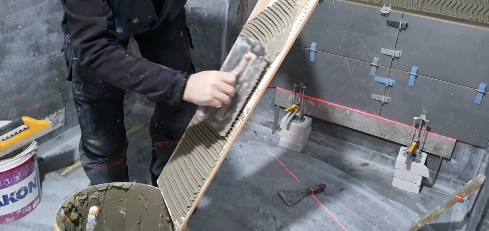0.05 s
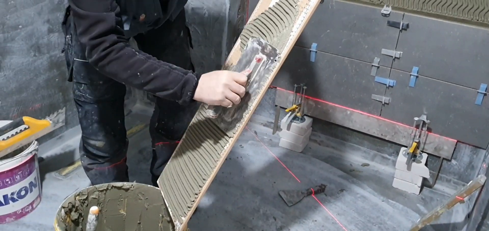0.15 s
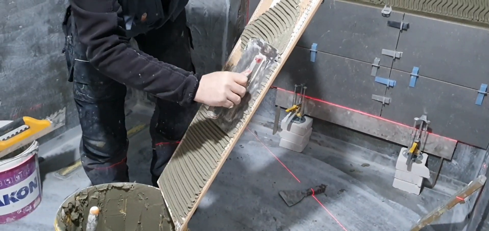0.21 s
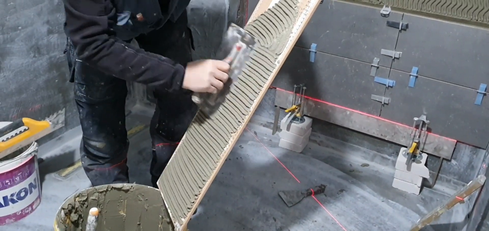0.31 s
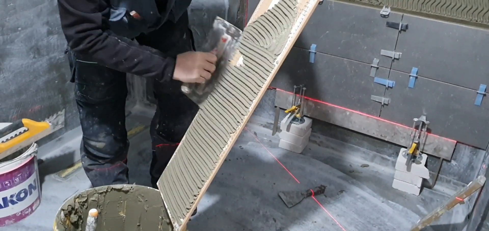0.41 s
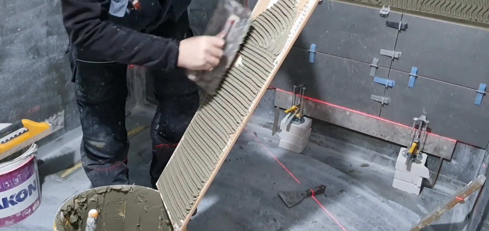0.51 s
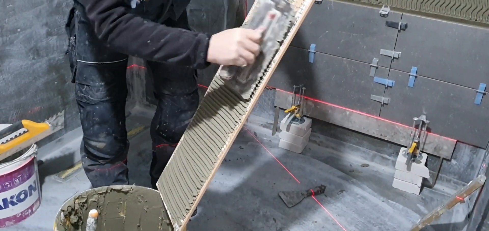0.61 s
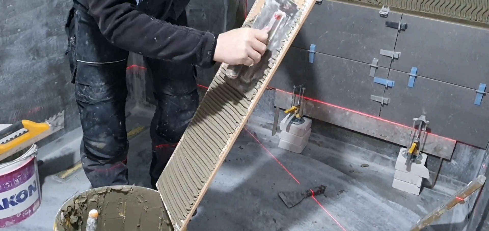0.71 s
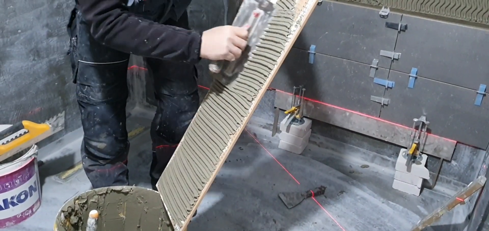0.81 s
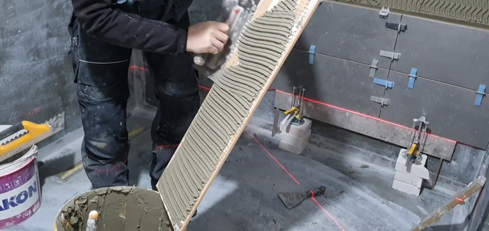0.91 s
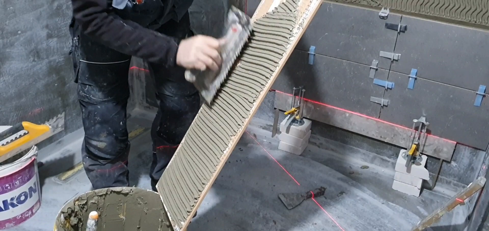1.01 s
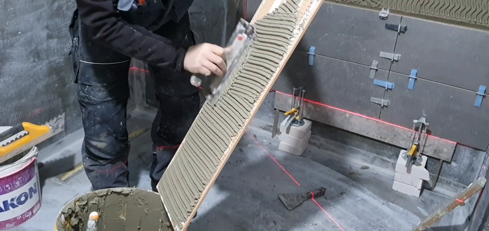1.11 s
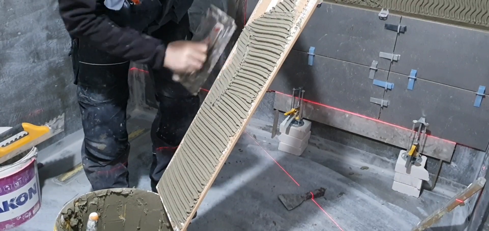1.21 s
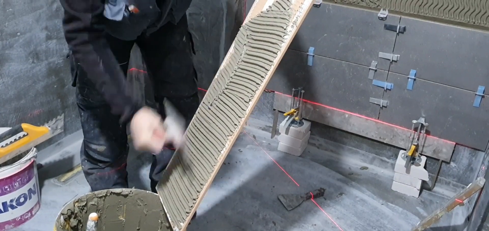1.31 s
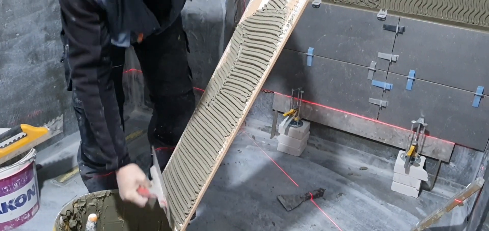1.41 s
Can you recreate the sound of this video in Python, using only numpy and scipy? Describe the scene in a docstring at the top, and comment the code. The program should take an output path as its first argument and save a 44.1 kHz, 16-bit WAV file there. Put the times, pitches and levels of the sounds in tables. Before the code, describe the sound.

A notched steel trowel combs sandy adhesive across a large tile in two long gritty rasps, each after a soft landing, then a short swipe with a sharp knock; close stereo in a small bare room.

```python
"""A faint room rumble, a scuff and a dull bump come first; then a notched steel trowel combs sandy adhesive over
a large tile in a small bare room: two long strokes, each after a soft landing, and a short swipe with a knock.
Sand grains slip under teeth all along the blade, the blade colours the rasp and the dragged paste shakes the tile.
Each spot along the blade has its own path to left and right; bumps, scuffs and bright hissing swells lie beneath."""
import sys
import numpy as np
from scipy import signal
from scipy.fft import rfft, irfft
from scipy.io import wavfile

SR = 44100
rng = np.random.default_rng(int(sys.argv[2]) if len(sys.argv) > 2 else 0)


def store_wav(level_fs):
    """Save 16-bit WAV to argv[1]."""
    pcm = np.round(np.clip(np.atleast_2d(level_fs), -1, 1) * 32767)
    wavfile.write(sys.argv[1], SR, pcm.T.astype(np.int16))


N = 66150  # 1.5 s


def undb(db):
    """Decibels to gain."""
    return 10 ** (np.asarray(db) / 20)


def unit(x):
    """Scale to rms 1."""
    return x / np.sqrt(np.mean(x ** 2))


def at_hz(points, hz):
    """Read (hz, value) points on a log-frequency axis."""
    point_hz, values = np.array(points, float).T
    return np.interp(np.log(np.maximum(hz, 1)), np.log(point_hz), values)


def colour(x, points):
    """Causal minimum-phase filter through (hz, db) points that keeps the power of white noise."""
    size = 2 * N
    gain = unit(undb(at_hz(points, np.fft.rfftfreq(size, 1 / SR))))
    # folding the cepstrum forward in time makes the filter causal
    cepstrum = irfft(np.log(gain))
    cepstrum[1:N] *= 2
    cepstrum[N + 1:] = 0
    return irfft(rfft(x, size) * np.exp(rfft(cepstrum)))[..., :N]


def resonance(hz, width_hz):
    """Points (hz, db) of a steep-sided resonance, 6 dB down at the edges of its width."""
    f = np.geomspace(20, 20000, 200)
    detuning = (f / hz - hz / f) * hz / width_hz
    return list(zip(f, -20 * np.log10(1 + detuning ** 2)))


# Likeness of left and right by frequency. Columns: pitch_hz, likeness (1 alike, 0 unrelated, -1 opposite)
CHANNEL_LIKENESS = [(100, 0.9), (250, 0.95), (500, 0.73), (1100, -0.064), (2000, -0.2), (4000, -0.23),
                    (9000, 0.08), (15000, 0.69)]


def pair(size):
    """Left and right noise whose likeness varies with frequency, shared out between their sum and difference."""
    like = np.clip(at_hz(CHANNEL_LIKENESS, np.fft.rfftfreq(size, 1 / SR)), -.99, .99)
    mid, side = rfft(rng.standard_normal((2, size)))
    mid = mid * np.sqrt((1 + like) / 2)
    side = side * np.sqrt((1 - like) / 2)
    return irfft(np.array([mid + side, mid - side]), size)


# Tone of the quiet room. Columns: pitch_hz, level_db (relative)
RUMBLE_TONE = [(25, -14), (55, -8.5), (85, 2.5), (130, -17), (270, -10.5), (600, -14.5), (1200, -16.5),
               (3000, -25.5), (8000, -30), (16000, -51.5)]
RUMBLE_DB = -68.5


def rumble():
    """Steady coloured noise on left and right: the faint rumble of the room."""
    return undb(RUMBLE_DB) * colour(pair(N), RUMBLE_TONE)


GRAINS_PER_S, GRAIN_SPREAD_DB = 2500, 3.5  # at each spot along the blade; scale of the random sizes


def grains(count=6):
    """Dense slips of sand, many small and a few large: one row per spot along the blade, total power 1."""
    hit = rng.random((count, N)) < GRAINS_PER_S / SR
    excess = np.minimum(rng.exponential(size=(count, N)), 5)
    size = undb(GRAIN_SPREAD_DB * excess)
    sign = rng.choice([-1, 1], (count, N))
    return unit(hit * size * sign) / np.sqrt(count)


def touches(events, tone, t):
    """Coloured grains under the summed exponential rises and decays of a table of events."""
    envelope = 0
    for peak_s, level_db, rise_s, decay_s in events:
        before, after = np.maximum(peak_s - t, 0), np.maximum(t - peak_s, 0)
        envelope = envelope + undb(level_db) * np.exp(-before / rise_s - after / decay_s)
    return colour(grains() * envelope, tone)


# Soft scuffs of tool and hand. Columns: peak_s, level_db, rise_s, decay_s
SCUFF_EVENTS = [(0.008, -49.5, 0.029, 0.013), (0.058, -61, 0.0062, .015), (1.102, -49.5, 0.0073, 0.0071),
                (1.47, -74.5, .015, 0.021)]
# Their tone. Columns: pitch_hz, level_db (relative)
SCUFF_TONE = [(70, -2.5), (160, -15.5), (280, 8.5), (430, -5), (680, 1.5), (1000, -1.5), (2200, -4.5),
              (4500, -6), (7000, -21), (12000, -30)]


def scuffs(t):
    """Tool and hand brush softly: short swells of grains, strongest in the low middle."""
    return touches(SCUFF_EVENTS, SCUFF_TONE, t)


# Dull handling bumps. Columns: peak_s, level_db, rise_s, decay_s
BUMP_EVENTS = [(0.008, -62, 0.034, 0.026), (0.32, -46.5, 0.011, 0.025), (0.422, -43.5, 0.034, 0.01),
               (0.945, -53.5, .012, 0.049), (1.113, -50.5, 0.0034, 0.02)]
# Their tone. Columns: pitch_hz, level_db (relative)
BUMP_TONE = [(25, -19), (60, 3), (120, 2.5), (200, -7.5), (400, -23), (1200, -42)]


def bumps(t):
    """Handling of the tool bumps dully: bass-heavy swells of grains."""
    return touches(BUMP_EVENTS, BUMP_TONE, t)


# Blade lands in the paste. Columns: peak_s, level_db, rise_s, decay_s
LANDING_EVENTS = [(0.111, -46.5, 0.0061, 0.02), (0.654, -45, 0.0014, 0.078)]
# Their tone. Columns: pitch_hz, level_db (relative)
LANDING_TONE = [(80, -22.5), (300, -8.5), (480, -6.5), (730, 0), (880, -2.5), (1300, -2), (2200, -2.5),
                (4000, -4.5), (7000, -10), (10000, -15), (16000, -18)]


def landings(t):
    """The blade lands grittily, cushioned by paste, before each long stroke."""
    return touches(LANDING_EVENTS, LANDING_TONE, t)


# Bright hissing swells around and after the strokes. Columns: peak_s, level_db, rise_s, decay_s
BRIGHT_SWELL_EVENTS = [(0.16, -57, .03, 0.056), (0.525, -62, 0.015, 0.061), (1.0, -48, .01, 0.024),
                       (1.11, -59.5, 0.014, 0.13)]
# Their tone. Columns: pitch_hz, level_db (relative)
BRIGHT_SWELL_TONE = [(300, -16), (1500, 5), (4000, 0), (8000, -3), (16000, -9)]


def bright_swells(t):
    """Bright grains swell and fade in a quiet hiss around and after the strokes."""
    return touches(BRIGHT_SWELL_EVENTS, BRIGHT_SWELL_TONE, t)


JUDDER_KNOTS_PER_S, JUDDER_DB = 200.7, 0.44


def judder():
    """Small random wander of the push, drawn as straight lines between random knots, in gain of rms 1."""
    knots = rng.standard_normal(4000)
    wander = unit(np.interp(np.arange(N) / SR * JUDDER_KNOTS_PER_S, np.arange(len(knots)), knots))
    return unit(undb(JUDDER_DB * wander))


# Three strokes over the tile, before the trims below. Columns: time_s, rasp_db,
# then relative to the rasp: drag_db, low_blade_db, high_blade_db, hiss_db
STROKE_PATHS = [
    [(0.209, -48, -26, 0.5, 5.5, -2.5), (0.223, -47, -31, -8, 7, -4.5), (0.255, -35, -8, -3, -2, -5),
     (0.335, -28.5, -6, -4, -2, -2.5), (0.361, -30, -7, -1.5, 0.5, -2), (0.405, -25, -17.5, -9, -3.5, -6),
     (0.458, -33, -0.5, -3, -2.5, -1.5)],
    [(0.714, -45, -6, -1.5, 1, -3.5), (0.736, -41, -12, -7.5, -6, -7), (0.756, -32.5, -10, 0, -3.5, -6.5),
     (0.844, -36, -3, 3.5, 6, -1), (0.856, -31, -12.5, -3.5, -12, -5.5), (0.91, -32, -6, -11, 5.5, 0.5),
     (0.924, -29, -15, -2, 1, -0.5), (0.966, -34.5, 1.5, -5, -6, -4.5)],
    [(1.168, -46.5, 8, -2, 5, -0.5), (1.184, -35, -8, -2, -5, -3.5), (1.216, -40, 0, 0, -6, -11),
     (1.224, -55, 1.5, 9, 8, -6), (1.25, -52, 9, 2, 1, -9)],
]
ATTACK_S, RELEASE_S = .003, .004
RASP_TRIM_DB, DRAG_TRIM_DB, HISS_TRIM_DB = 2, -2, 3
# Tones of rasp, dragged paste and fine hiss. Columns: pitch_hz, level_db (relative)
RASP_TONE = [(200, -30), (450, -13.5), (800, -12), (1200, -13.5), (1800, -2), (2800, 1), (3800, -2),
             (5500, -5.5), (7600, -4.5), (9500, -16.5), (16000, -40)]
DRAG_TONE = [(25, -34.5), (50, -16), (90, -9.5), (160, -7), (280, 0.5), (420, -5), (560, 0), (700, -4.5),
             (1000, -21), (2000, -36)]
HISS_TONE = [(4000, -46.5), (7000, -7), (8500, 0.5), (10500, 1), (13000, 2.5), (16000, -1)]
# Two resonances of the blade. Columns: pitch_hz, width_hz, trim_db
BLADE_RESONANCES = [(1218, 1050, -0.5), (3910, 1980, 0)]


def scrape(t):
    """Each stroke drives grains through rasp, paste drag, two blade resonances and hiss, juddering together."""
    drive = np.zeros((5, N))
    for stroke in STROKE_PATHS:
        time_s, rasp_db, *shares_db = np.array(stroke, float).T
        before, after = np.maximum(time_s[0] - t, 0), np.maximum(t - time_s[-1], 0)
        gate = np.exp(-before / ATTACK_S - after / RELEASE_S)
        push = gate * undb(np.interp(t, time_s, rasp_db))
        drive += [push] + [push * undb(np.interp(t, time_s, share_db)) for share_db in shares_db]
    rasp, drag, low, high, hiss = drive * judder()
    out = undb(RASP_TRIM_DB) * colour(grains() * rasp, RASP_TONE)
    out = out + undb(DRAG_TRIM_DB) * colour(grains() * drag, DRAG_TONE)
    for force, (hz, width_hz, trim_db) in zip((low, high), BLADE_RESONANCES):
        out = out + undb(trim_db) * colour(grains() * force, resonance(hz, width_hz))
    return out + undb(HISS_TRIM_DB) * colour(grains() * hiss, HISS_TONE)


# Trowel meets the tile's lower edge. Columns: peak_s, level_db, rise_s, decay_s
KNOCK_EVENTS = [(1.19, -26, 0.012, 0.0084)]
# Its tone. Columns: pitch_hz, level_db (relative)
KNOCK_TONE = [(70, -14), (150, -15.5), (450, -7), (570, -4.5), (660, 6), (760, -11), (940, 5),
              (1080, -14.5), (1210, 7), (1500, -15.5), (1830, -4.5), (2600, -6.5), (4200, -0.5), (8000, -8),
              (10000, -12.5), (16000, -28)]


def knock(t):
    """The trowel knocks grittily on the tile's lower edge: a short burst of grains with several tonal peaks."""
    return touches(KNOCK_EVENTS, KNOCK_TONE, t)


# Ringing of tile and blade, before the trim below. Columns: pitch_hz, level_db, t60_s
RING_MODES = [(267.6, -5, 0.36), (284, -9.5, 0.18), (540, -7, 0.17), (554, -4, 0.25), (668, -7.5, 0.28),
              (928, -8, 0.08), (1213, -1.5, .36), (1240, -13.5, 0.51), (1395, -10.5, .2), (1920, -8, .25),
              (2284, -8.5, 0.14), (2790, -15, 0.14), (3450, -4, 0.13), (3960, -16.5, .2)]
RING_TRIM_DB = -2.5


def ring(x, t):
    """Tile and blade ring on at their modes, each a decaying cosine set off by the work."""
    response = 0
    for hz, level_db, t60_s in RING_MODES:
        damping = np.log(1000) / t60_s  # 60 dB down after t60_s
        gain = undb(level_db + RING_TRIM_DB) * 4 * damping / SR
        response = response + gain * np.exp(-damping * t) * np.cos(2 * np.pi * hz * t)
    return signal.fftconvolve(x, response)[:N]


# Decay of the small bare room. Columns: pitch_hz, t60_s
ROOM_DECAY = [(100, 0.2), (700, 0.3), (2000, 0.26), (5000, 0.24), (13000, 0.06)]
# Reverberation, before the overall room gain. Columns: pitch_hz, level_db
ROOM_LEVEL = [(100, -7), (500, -0.5), (1200, 0.5), (4000, -2), (8000, -5.5), (14000, -6)]
EARLY_S, EARLY_DB = 0.0054, 3  # scatter off the tile, the arm and the floor, relative to the tail
DIRECT_DB, ROOM_GAIN_DB = -2, -.5  # direct sound before the gain; gain on direct and reverberation


def room(x, size=16384):
    """One spot to left and right: direct sound, quick scatter from near surfaces and a tail shortest on top."""
    t, hz = np.arange(size) / SR, np.fft.rfftfreq(size, 1 / SR)
    centres = np.geomspace(60, 16000, 12)
    late, early = rfft(pair(size)), rfft(pair(size))
    scatter = undb(EARLY_DB) * unit(np.exp(-t / EARLY_S))
    response = np.zeros((2, size))
    for k, centre in enumerate(centres):
        # triangular band between neighbouring centres
        band = at_hz(list(zip(centres, np.arange(len(centres)) == k)), hz)
        decay = np.exp(-np.log(1000) * t / at_hz(ROOM_DECAY, centre))
        tail = unit(decay * (1 - np.exp(-t / EARLY_S)))
        reverberation = irfft(late * band) * tail + irfft(early * band) * scatter
        response += undb(at_hz(ROOM_LEVEL, centre)) * reverberation / np.sqrt(size)
    response[:, 0] += undb(DIRECT_DB)
    return undb(ROOM_GAIN_DB) * signal.fftconvolve(x[None], response, axes=1)[:, :N]


BALANCE_DB = -1  # left relative to right


def scene():
    """Each spot along the blade, and the ringing, takes its own path through the room over the rumble."""
    t = np.arange(N) / SR
    work = scuffs(t) + bumps(t) + landings(t) + bright_swells(t) + scrape(t) + knock(t)
    heard = sum(room(spot) for spot in work)
    heard = heard + room(ring(work.sum(axis=0), t))
    balance = undb(np.array([[BALANCE_DB], [-BALANCE_DB]]) / 2)
    return heard * balance + rumble()


TOP_HZ = 15800


def record(dry):
    """The recorder cuts the top with a steep elliptic low-pass."""
    low_pass = signal.ellip(10, .2, 80, TOP_HZ, fs=SR, output="sos")
    return signal.sosfilt(low_pass, dry)


dry = scene()
out = record(dry)
store_wav(out)
```